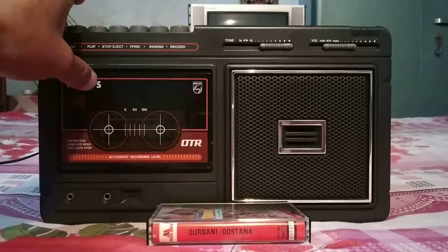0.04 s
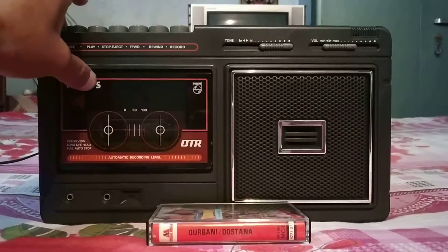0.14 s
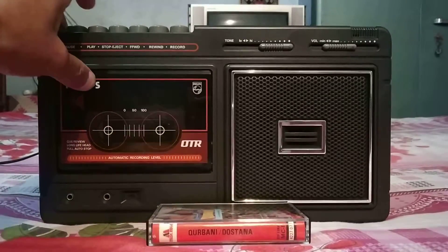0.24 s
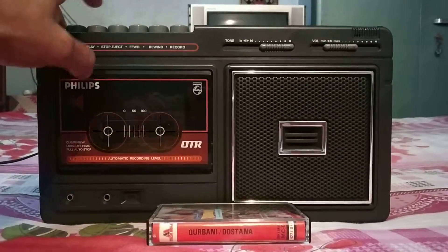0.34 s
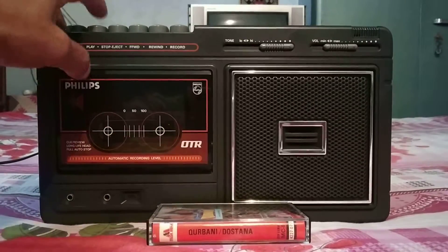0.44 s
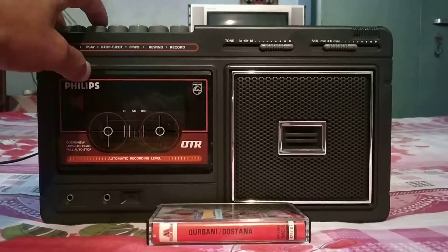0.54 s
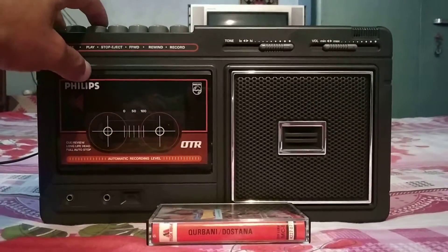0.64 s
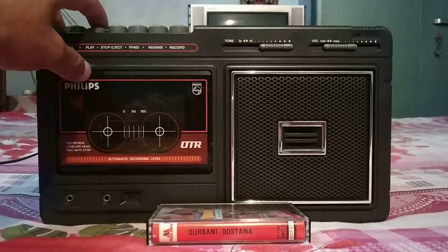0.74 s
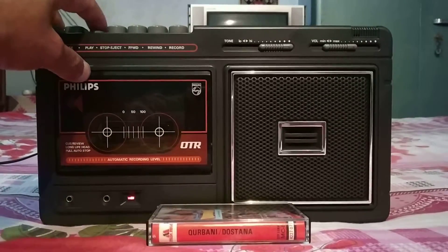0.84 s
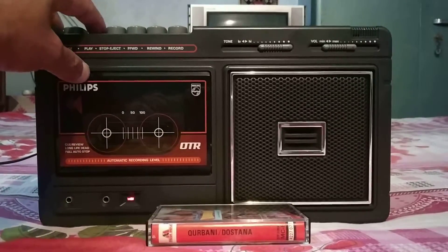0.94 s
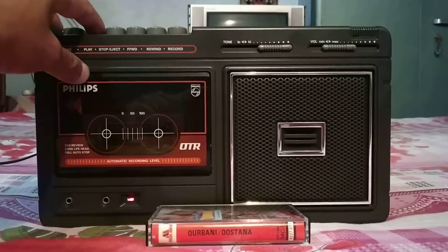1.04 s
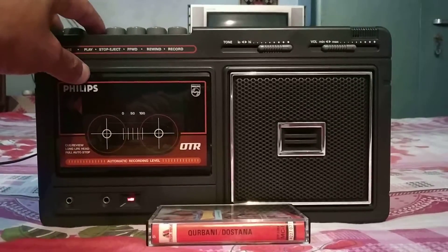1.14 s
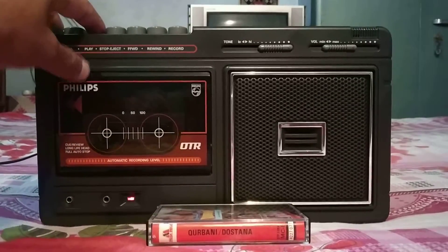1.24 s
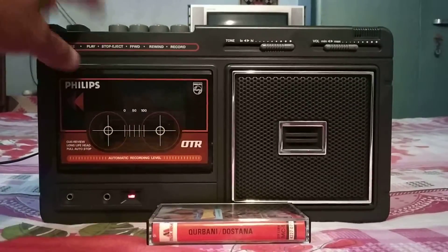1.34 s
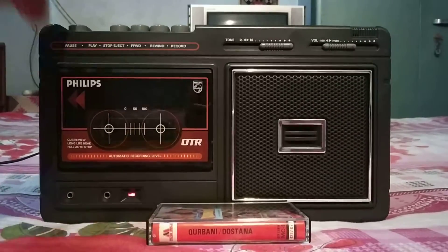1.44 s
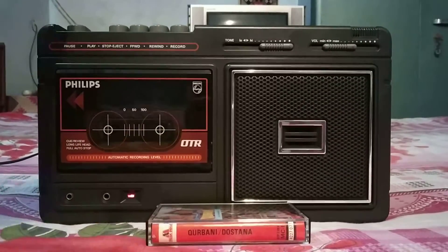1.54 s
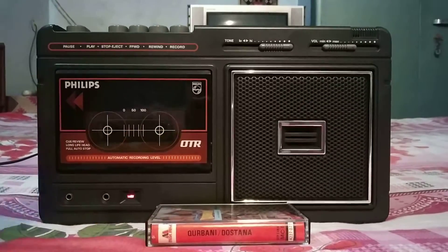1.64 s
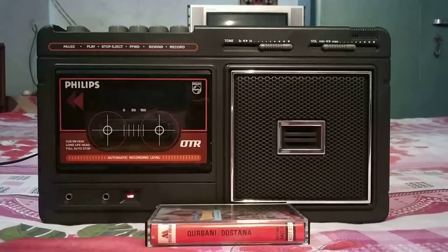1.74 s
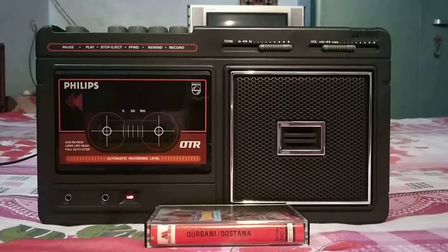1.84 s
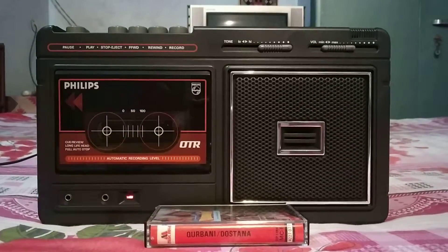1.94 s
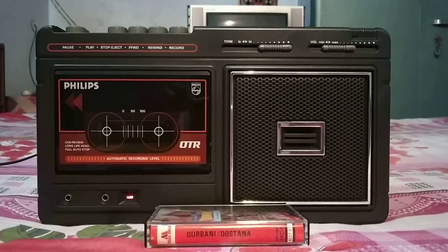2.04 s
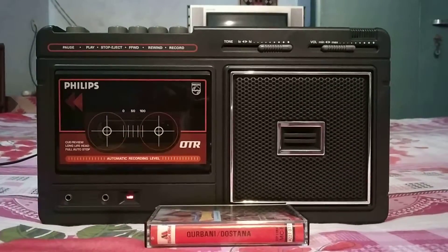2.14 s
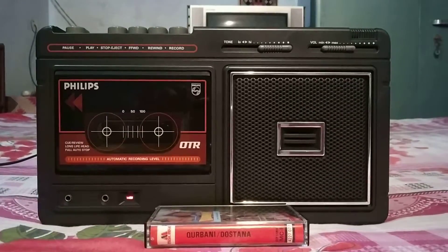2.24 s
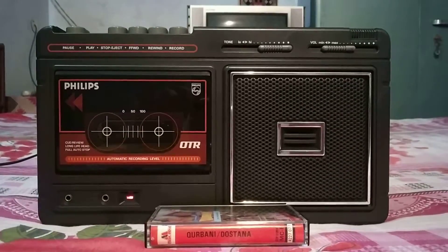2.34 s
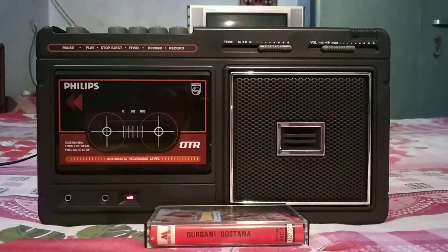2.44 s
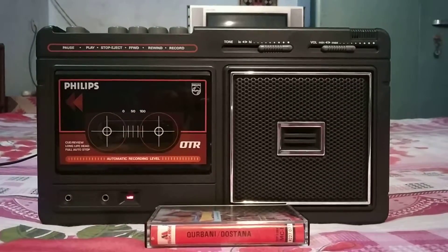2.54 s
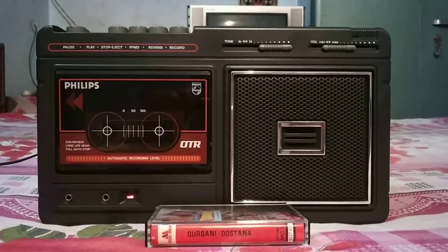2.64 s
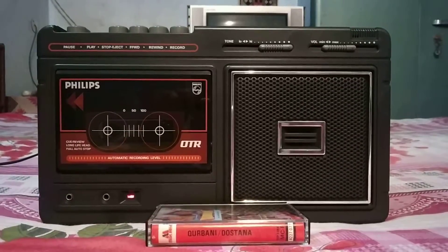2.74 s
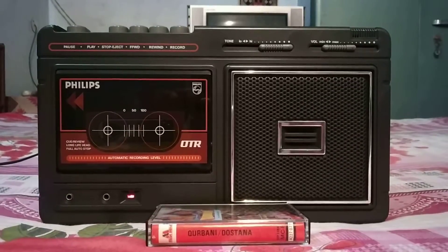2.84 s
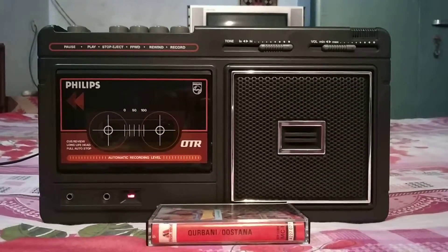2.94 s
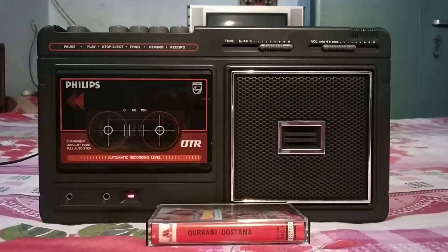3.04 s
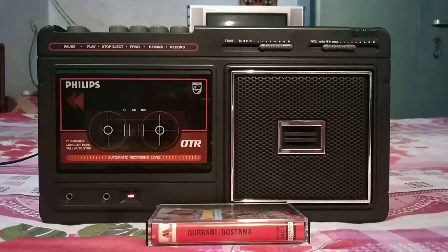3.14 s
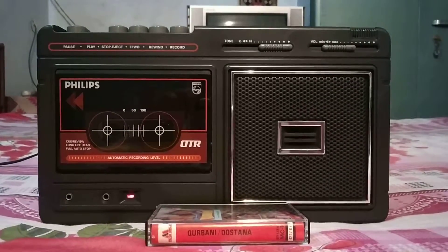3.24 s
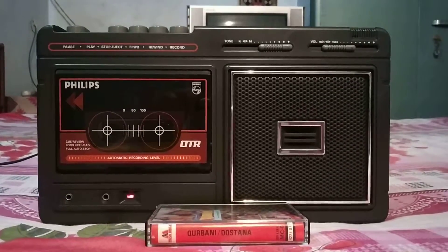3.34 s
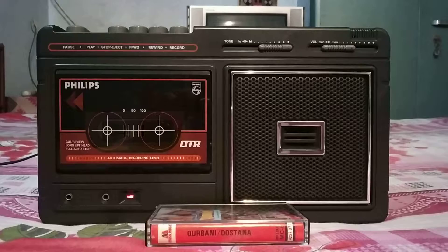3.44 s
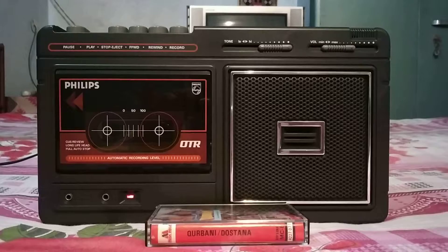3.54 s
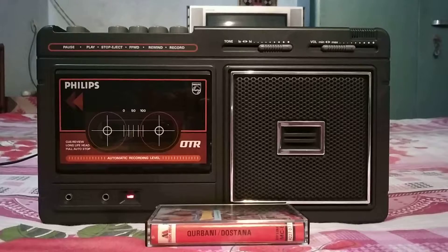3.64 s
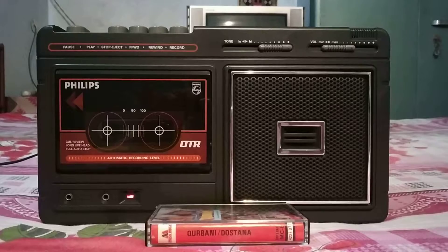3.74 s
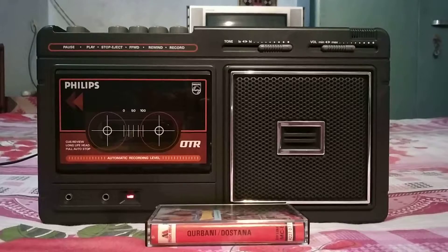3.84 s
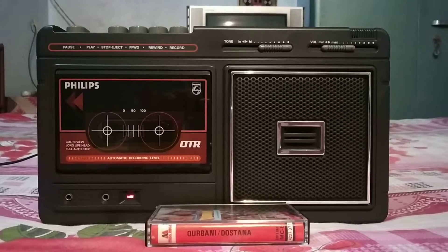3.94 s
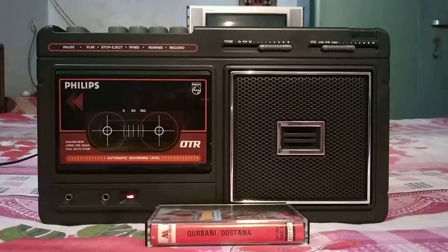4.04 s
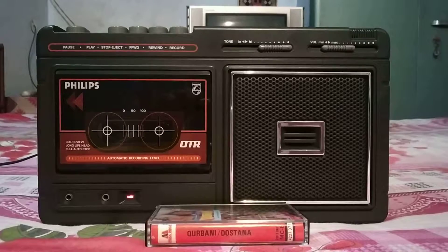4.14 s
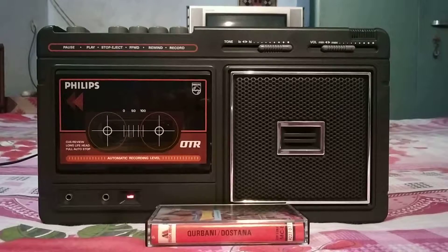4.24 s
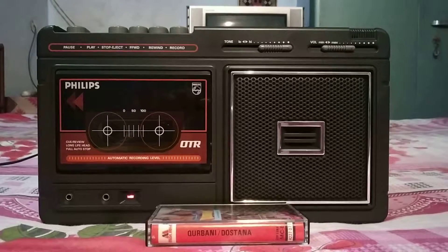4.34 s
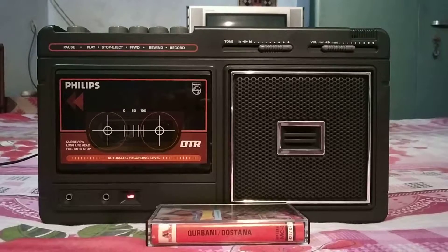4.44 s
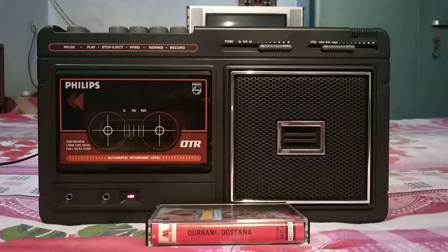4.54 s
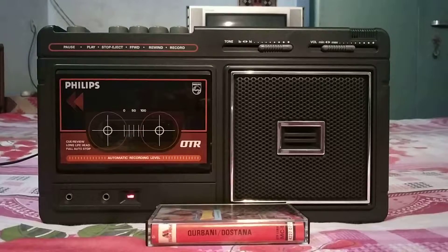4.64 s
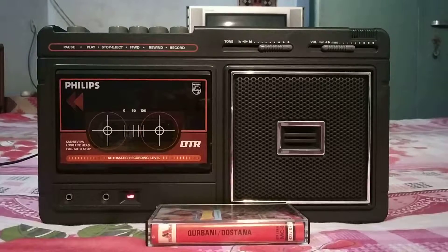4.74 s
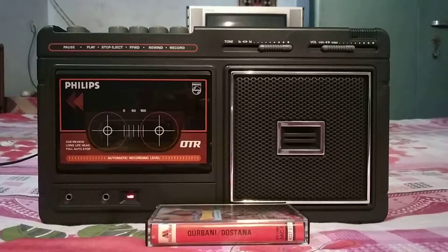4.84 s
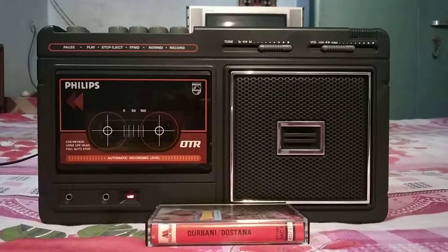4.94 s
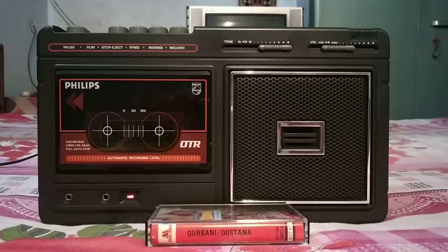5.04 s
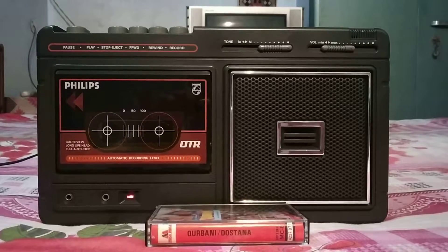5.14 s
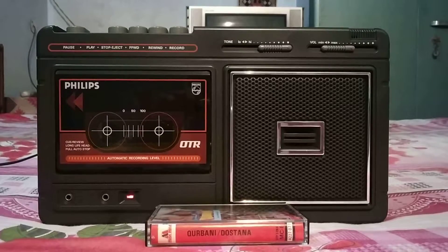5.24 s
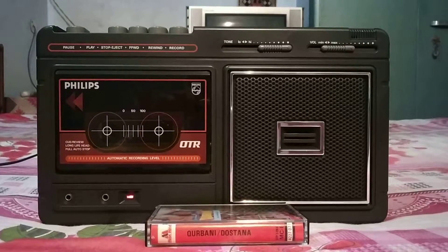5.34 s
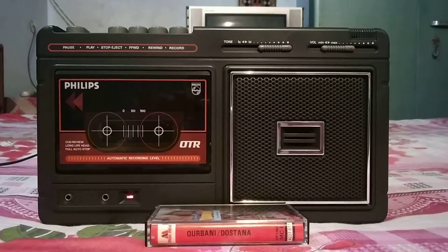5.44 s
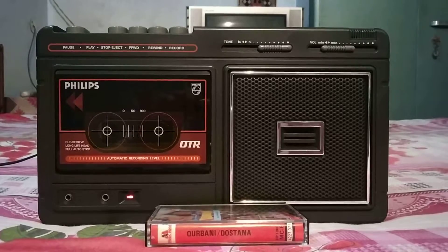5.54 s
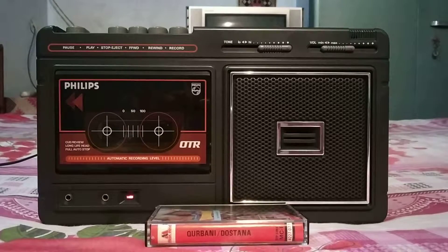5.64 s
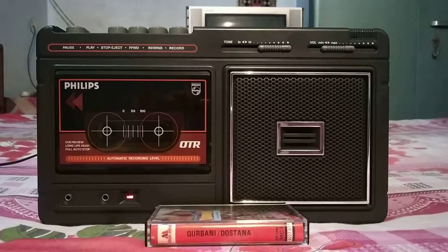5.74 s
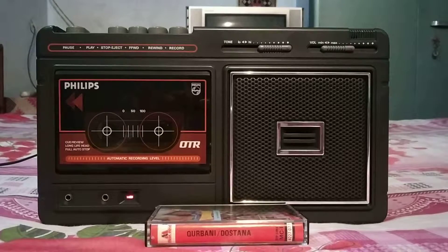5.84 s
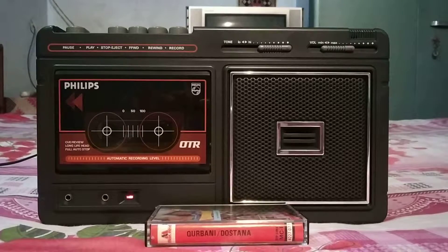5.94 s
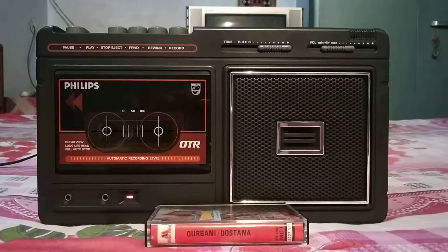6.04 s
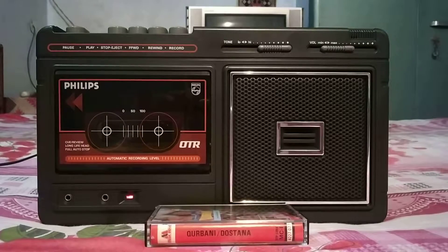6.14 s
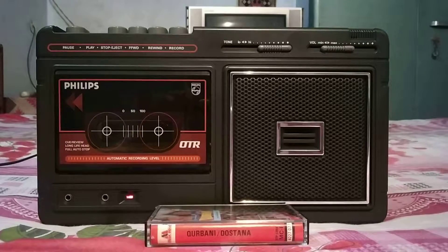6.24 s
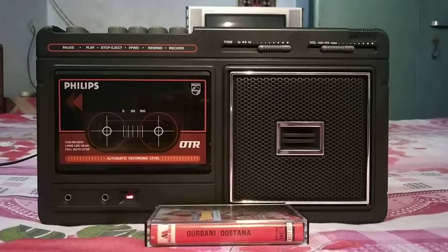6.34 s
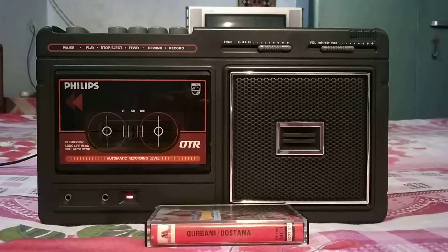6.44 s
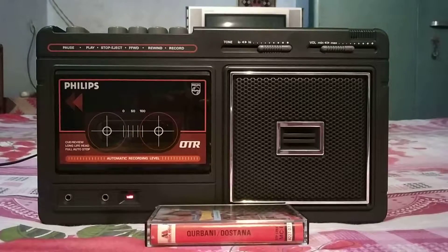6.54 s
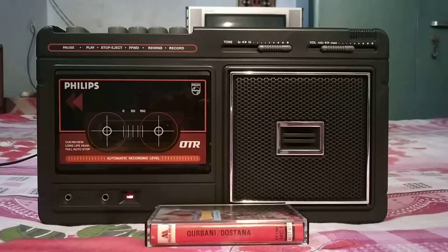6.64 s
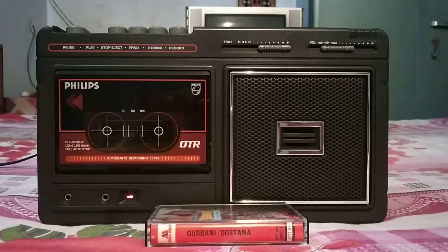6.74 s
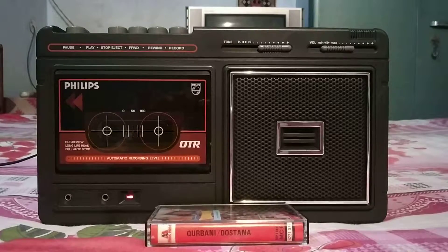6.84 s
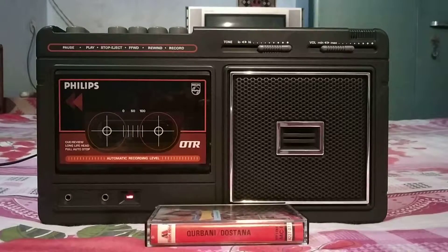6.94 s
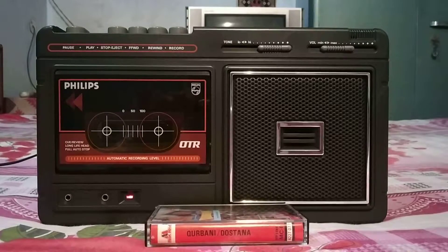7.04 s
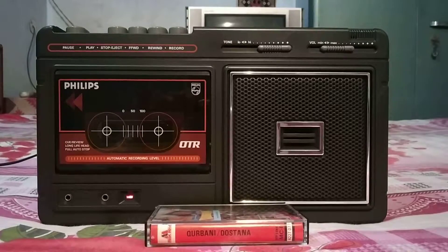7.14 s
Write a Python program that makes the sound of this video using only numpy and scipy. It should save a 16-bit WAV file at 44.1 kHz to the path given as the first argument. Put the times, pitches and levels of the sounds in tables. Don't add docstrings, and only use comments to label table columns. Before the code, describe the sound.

Close stereo pickup in a small room with a short reverberant tail. A low, steady fan drone with soft whirr and faint hiss runs throughout, and a distant clock gives a very faint double tick each second from 0.5 s. A light plastic click opens, then a cluster of hollow clacks at 0.25 s. A small click at 0.69 s leads to a deep, soft door thump at 0.79 s, clacks at 0.88 s, and the loudest sharp key latch at 1.01 s. More clacks follow at 1.24 s as quiet motor tones rise and a thin buzz sounds until 1.47 s. From 2.03 to about 2.7 s something scrapes on the right, with a groan falling in pitch at 2.1-2.3 s. Bright little ticks cluster around 2.4 s and become sparse until 4.4 s. From 3.3 s a faint high whistling, sizzling mains buzz continues to the end at 7.2 s.

```python
import sys
import numpy as np
from scipy import signal
from scipy.fft import rfft, irfft, next_fast_len
from scipy.io import wavfile
from scipy.ndimage import uniform_filter1d

SR = 44100
rng = np.random.default_rng(int(sys.argv[2]) if len(sys.argv) > 2 else 0)


def boost(x):
    u = np.asarray(x, float) / 20
    return 10 ** u


def bounce(signal):
    frames = np.transpose(np.atleast_2d(signal))
    limited = np.clip(frames, -1, 1)
    pcm = np.round(limited * 32767).astype(np.int16)
    wavfile.write(sys.argv[1], SR, pcm)


N = 317079
LAG = 7


def rms_one(x):
    return x / np.sqrt(np.mean(x ** 2) + 1e-20)


def in_time(rows, off=None):
    s, *columns = np.transpose(rows)
    return [np.interp(np.arange(N) / SR, s, column, left=off, right=off) for column in columns]


def at_hz(points, hz):
    point_hz, value = np.transpose(points)
    return np.interp(np.log(hz), np.log(point_hz), value)


def drift(rate):
    count = int(N / SR * rate * 2) + 2
    return np.interp(np.arange(N), np.linspace(0, N, count), rng.standard_normal(count))


def pan(db):
    return boost(np.array([[db / 2], [-db / 2]]))


# (frequency [Hz], likeness [0 to 1])
LIKENESS = [(60, 0.51), (290, 1), (640, 0.59), (1400, 0.16), (3000, 0.065), (15000, 0.031)]


def noise(spectrum):
    size = next_fast_len(N)
    hz = np.maximum(np.arange(size // 2 + 1) * SR / size, 1)
    mid, side = rfft(rng.standard_normal((2, size)))
    alike = np.clip(at_hz(LIKENESS, hz), 0, 1)
    pair = np.sqrt(1 + alike) * mid + np.sqrt(1 - alike) * side * [[1], [-1]]
    return rms_one(irfft(pair * boost(at_hz(spectrum, hz)), size)[:, :N])


def patchy(x, depth_db):
    _, _, cells = signal.stft(x, nperseg=1024)
    _, bins, frames = cells.shape
    gain = rng.standard_normal((2, bins // 3 + 1, frames // 2 + 1))
    gain = gain.repeat(3, axis=1).repeat(2, axis=2)[:, :bins, :frames]
    _, out = signal.istft(cells * boost(depth_db * gain), nperseg=1024)
    return rms_one(out[:, :N])


def ring(x, modes):
    out = 0
    for hz, db, t60 in modes:
        r = boost(-60 / (t60 * SR))
        w = 2 * np.pi * hz / SR
        out = out + signal.lfilter([0, boost(db) * np.sin(w)], [1, -2 * r * np.cos(w), r * r], x + 1e-18)
    return out


def bursts(times, dbs, t60s, pans):
    out = np.zeros((2, N))
    for s, db, t60, side_db in zip(times, dbs, t60s, pans):
        i = round(s * SR)
        t = np.arange(min(N - i, SR // 4)) / SR
        onset = np.minimum(t / 0.00013, 1)
        out[:, i:i + len(t)] += boost(db - 60 * t / t60) * onset * pan(side_db)
    return out


def lines(table, wander_hz, flicker_db):
    out = 0
    for hz, db in table:
        phase = 2 * np.pi * np.cumsum(hz + wander_hz * drift(6)) / SR + rng.uniform(0, 6.15)
        lag = np.array([[LAG], [0]]) * 2 * np.pi * hz / SR
        out = out + boost(db + flicker_db * drift(8)) * np.sin(phase - lag)
    return np.sqrt(2) * out


# (time [s], whirr level [dB], hiss level [dB])
AIR_LEVELS = [(0, -54, -58), (.1, -63, -66), (.66, -63, -66.5), (.81, -62, -66), (.87, -60, -60),
              (.93, -61, -64), (1.2, -60, -63), (1.41, -58.5, -62), (2.01, -59, -62), (2.9, -59, -62),
              (3.25, -58.5, -62), (3.61, -57.5, -62), (5.4, -57.5, -62), (7.19, -57.5, -62)]
# (frequency [Hz], density [dB per Hz])
RUMBLE = [(25, -56), (60, -29), (110, -25.5), (150, -11.5), (195, -1), (240, -2), (290, -0.5), (350, -0.5),
          (420, -27), (600, -57)]
# (frequency [Hz], density [dB per Hz])
WHIRR = [(220, -31), (380, -3), (414, 0), (546, -4), (585, -7.5), (638, -8.5), (746, -14), (849, -9.5),
         (1100, -13.5), (1320, -10.5), (3000, -23), (3900, -61), (6600, -120)]
# (frequency [Hz], density [dB per Hz])
AIR_HISS = [(1180, -24), (2000, 1), (2570, -2.5), (3780, -1.5), (4600, -1), (5370, 0.5), (6170, -1.5),
            (6660, -0.5), (7390, -3.5), (11800, -2.5), (15600, -3)]


def air():
    whirr_db, hiss_db = in_time(AIR_LEVELS)
    rumble = boost(-55 + 0.3 * drift(4.5)) * noise(RUMBLE)
    whirr = boost(whirr_db + 1.35 + 0.74 * drift(4.2)) * noise(WHIRR)
    hiss = boost(hiss_db + 6.0 + 0.92 * drift(7.2)) * patchy(noise(AIR_HISS), depth_db=4.5)
    return (rumble + whirr) * pan(3.3) + hiss * pan(0.96)


# (frequency [Hz], rms level [dB])
MAINS_HUM = [(199.2, -64), (290.7, -70.5)]
# (frequency [Hz], rms level [dB])
MOTOR = [(414.5, -68), (543.7, -68), (624.5, -66.5), (667.5, -72), (705.2, -72.5)]


def drone():
    fan_hz, fan_db = 336.7, -48
    running = np.clip((np.arange(N) / SR - 1.05) / .3, 0, 1)
    fan = lines([(fan_hz, fan_db)], wander_hz=0.39, flicker_db=0.55)
    hum = lines(MAINS_HUM, wander_hz=1.74, flicker_db=1.0)
    motor = running * lines(MOTOR, wander_hz=1.17, flicker_db=2.0)
    return (fan + hum + motor) * pan(2.1)


# (time [s], crack peak [dB], clack level [dB], cabinet level [dB],
# rattle t60 [s], left-right difference [dB])
KNOCKS = [(.0024, -38, -45, -45.5, 0.026, 8.5), (0.2436, -29, -45.5, -31.5, 0.017, 0),
          (0.2565, -21.5, -37.5, -32, .022, 1), (0.265, -47, -50, -29, 0.019, 0.5),
          (0.6897, -41, -43, -37.5, 0.032, 2), (0.8754, -26.5, -35, -44, 0.018, 4.5),
          (0.8844, -31, -47, -40, .021, -3), (1.0064, -23, -43, -50, 0.022, 7),
          (1.0108, -9, -28.5, -38, 0.023, 3.5), (1.0136, -8, -21.5, -28.5, 0.013, 3),
          (1.0157, -18.5, -35, -33, 0.034, 2), (1.2342, -24.5, -45, -34, 0.024, -2),
          (1.241, -28, -36.5, -31, 0.016, 3.5), (1.2914, -50, -50, -45, 0.023, 1)]
# (frequency [Hz], density [dB per Hz])
CRACK = [(1470, -16.5), (2500, -15), (3370, -10), (5460, -2), (6270, -10.5), (9120, -4), (9930, -7),
         (11100, -5.5), (15600, -15.5)]
# (frequency [Hz], level [dB], t60 [s])
PANELS = [(835, -16.5, 0.016), (1000, -13, 0.015), (1165, -9.5, 0.019), (1305, -6.5, .018),
          (1500, -4, 0.011), (1740, -4, 0.012), (2070, -5.5, 0.0082), (2600, -9, 0.0086)]
# (frequency [Hz], level [dB], t60 [s])
CABINET = [(240, -7, 0.19), (325, -3, .07), (438, 3, 0.086), (508.3, 6, 0.082), (603, -4, 0.035)]


def knocks():
    s, crack_db, clack_db, cabinet_db, t60, side_db = np.transpose(KNOCKS)
    grit = boost(1.65 * rng.exponential(1, N // 8 + 1)).repeat(8)[:N]
    crackle = noise(CRACK) * rms_one(grit) * bursts(s, crack_db - 7, t60, np.full(len(s), 1.6))
    rattle = rng.standard_normal(N) * bursts(s, clack_db - 13, 1.35 * t60, side_db + 1.5)
    push = rng.standard_normal(N) * bursts(s, cabinet_db - 24, t60, side_db + 1.3)
    return crackle + ring(rattle, PANELS) + ring(push, CABINET)


# (frequency [Hz], t60 [s])
ROOM_T60 = [(150, 0.51), (1000, 0.35), (4000, 0.39), (15000, 0.25)]


def room(x):
    t = np.arange(SR // 2) / SR
    tail = 0
    for hz in 177 * 2. ** np.arange(7):
        band = signal.butter(2, [hz / np.sqrt(2), hz * np.sqrt(2)], "band", fs=SR, output="sos")
        grain = signal.sosfilt(band, rng.standard_normal((2, len(t))))
        tail = tail + grain * boost(-60 * t / at_hz(ROOM_T60, hz))
    tail = tail * np.clip((t - .004) / 0.0078, 0, 1)
    return signal.fftconvolve(x, tail / np.sqrt(np.sum(tail[0] ** 2)), axes=1)[:, :N]


# (time [s], peak level [dB], centre [Hz], width [octaves], left-right difference [dB])
TICKS = [(0.3224, -40.5, 4500, 0.66, 2), (.398, -43, 13000, .6, 2), (0.7814, -32, 2770, 1.8, 1.5),
         (0.7897, -39, 4000, 2.7, 10), (1.419, -43.5, 1620, 1.1, 9), (2.05, -49, 6000, 2.5, -7),
         (2.242, -37, 2000, 1.9, -6), (2.30, -42, 7020, 1.5, -5), (2.355, -25, 10000, 1.5, -6),
         (2.37, -31, 6540, 0.91, -9), (2.414, -32.5, 9000, 0.82, -4), (2.467, -31, 9000, 0.77, 0),
         (2.470, -39.5, 1500, 1.4, -3), (2.524, -34, 8500, 1.2, 4), (2.561, -34, 12000, 0.73, 0),
         (2.666, -34, 8900, 1.4, -13), (2.8702, -33.5, 9000, 1.4, 16), (2.870, -39.5, 1200, 1.1, 13),
         (3.167, -43, 9000, 1.5, -3), (3.59, -39, 9000, 1.4, 5), (3.919, -35, 8000, 1.6, 10),
         (3.920, -46, 1200, 1, 8), (4.432, -41, 1000, 0.76, 6), (4.433, -37, 9000, 1.3, 11)]


def ticks():
    length = 600
    out = np.zeros((2, N))
    snaps = rng.standard_normal((len(TICKS), 2, length))
    for (s, db, hz, octaves, side_db), snap in zip(TICKS, snaps):
        snap = snap if hz > 5000 else snap[[0, 0]]
        snap = snap + 5 * (np.arange(length) == 0)
        snap = snap * np.exp(-np.arange(length) / 44.0)
        edges = np.clip([hz * 2 ** (-octaves / 2), hz * 2 ** (octaves / 2)], 100, .45 * SR)
        snap = signal.sosfilt(signal.butter(2, edges, "band", fs=SR, output="sos"), snap)
        i = round(s * SR)
        peak = np.abs(snap).max(axis=1, keepdims=True)
        out[:, i:i + length] += boost(db) * pan(side_db) * snap / peak
    return out


def clock():
    s = .51 + np.arange(7)
    both = np.concatenate([s, s + 0.013])
    shape = bursts(both, -55 + rng.normal(0, 1.0, 14), np.full(14, .12), np.zeros(14))
    return noise([(900, -27), (1500, 2), (2100, -2), (3200, -8), (5000, -21)]) * shape


# (frequency [Hz], level [dB], t60 [s])
THUMP = [(488, 3, 0.01), (229, -17, 0.18), (257, -21, .1), (312, -21, 0.17), (450, -30.5, 0.097),
         (395, -37.5, 0.13), (705, -9, 0.0062), (1200, -13.5, .008)]


def thump():
    time_s, level_db, soft_hz = .7893, -3.5, 840
    click = np.zeros(N)
    click[round(time_s * SR)] = -boost(level_db)
    soft = signal.sosfilt(signal.butter(2, soft_hz, fs=SR, output="sos"), click)
    return ring(soft, THUMP) * pan(2.5)


# (time [s], level [dB])
BUZZ = [
    (0, -100),
    (1.24, -100),
    (1.26, -61),
    (1.45, -62),
    (1.49, -100),
    (3.29, -100),
    (3.31, -61),
    (7.19, -63),
]
# (frequency [Hz], density [dB per Hz])
SIZZLE = [(2500, -60), (3500, -12.5), (4300, -8.5), (5300, -3), (6000, -6), (6500, -5.5), (7000, -15),
          (7600, -32), (9000, -60)]
WHISTLES = [5695.8, 6435.2, 6452.5]
# (distance [mains beats], rms level [dB])
SIDE_TONES = [
    [(-5, -80), (-3, -80), (-2, -76), (0, -75), (1, -76), (4, -79), (5, -80)],
    [(-2, -74), (-1, -77), (0, -67.5), (1, -65.5), (3, -80), (4, -81)],
    [(0, -70), (1, -71), (2, -82)],
]


def buzz():
    beat_hz = 100.07
    level = boost(in_time(BUZZ)[0])
    beat = 2 * np.pi * beat_hz * np.arange(N) / SR
    pulse = 1 + 0.29 * np.sin(beat) + 0.56 * np.sin(2 * beat) + 0.39 * np.sin(3 * beat)
    sizzle = noise(SIZZLE) * pulse
    tones = []
    for hz, row in zip(WHISTLES, SIDE_TONES):
        tones += [(hz + k * beat_hz, db) for k, db in row]
    whistles = boost(61.5) * lines(tones, wander_hz=.8, flicker_db=1.5)
    return level * (sizzle * pan(3.5) + whistles * pan(5))


# (time [s], hiss level [dB], rub level [dB])
SLIDE = [(2.02, -70, -62), (2.045, -52.5, -49), (2.1, -49.5, -49.5), (2.2, -49.5, -47.5),
         (2.28, -51, -49.5), (2.37, -51, -51.5), (2.40, -55, -49.5), (2.46, -57.5, -52.5), (2.52, -61, -56),
         (2.6, -62, -56.5), (2.7, -62, -64), (2.8, -63, -70)]
# (frequency [Hz], density [dB per Hz])
SLIDE_HISS = [(1470, -33), (2500, -5.5), (3960, -7), (5760, 2), (7140, -4.5), (9700, -1.5), (11300, -6.5),
              (12500, -3), (15600, -6)]
# (frequency [Hz], density [dB per Hz])
SLIDE_RUB = [(150, 7.5), (300, 4.5), (600, -2.5), (1200, -5), (2500, -14), (4000, -22)]
# (time [s], slip rate [Hz], level [dB])
GROAN = [(2.08, 450, -56), (2.1, 411, -47), (2.125, 373, -50.5), (2.15, 314, -50), (2.175, 275, -42.5),
         (2.205, 207, -39), (2.235, 193, -39), (2.265, 175, -48), (2.29, 150, -43), (2.32, 130, -56)]


def slide():
    hiss_db, rub_db = in_time(SLIDE, off=-120)
    slip_hz = in_time(GROAN)[0]
    groan_db = in_time(GROAN, off=-120)[1]
    phase = 2 * np.pi * np.cumsum(slip_hz * (1 + 0.0194 * drift(60))) / SR
    groan = np.sqrt(2) * (np.sin(phase) + 0.099 * np.sin(2 * phase))
    groan = uniform_filter1d(boost(groan_db), size=400) * groan * boost(4 * drift(45))
    hiss = boost(hiss_db + 2.0 + 2.0 * drift(40)) * patchy(noise(SLIDE_HISS), depth_db=3.5)
    rub = boost(rub_db + 3.5 + 2.2 * drift(25)) * noise(SLIDE_RUB)
    return (hiss + rub) * pan(-8) + groan * pan(-6.5)


def scene():
    clicks = knocks()
    clicks = np.array([np.roll(clicks[0], LAG), clicks[1]]) + ticks()
    door = thump()
    near = clicks + door + room(boost(-9.5) * clicks + boost(-14.5) * door) + slide()
    near = signal.sosfilt(signal.butter(8, 190, "high", fs=SR, output="sos"), near)
    return near + clock() + buzz() + drone() + air()


def band_limit(x):
    return signal.sosfilt(signal.butter(12, 16470, fs=SR, output="sos"), x)


def record(dry):
    top_cut = signal.cheby2(16, 60, 16150, fs=SR, output="sos")
    mix = signal.sosfilt(top_cut, dry)
    return band_limit(mix)


dry = scene()
out = record(dry)
bounce(out)
```